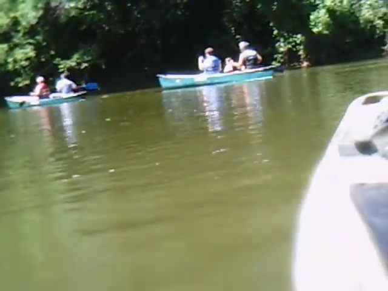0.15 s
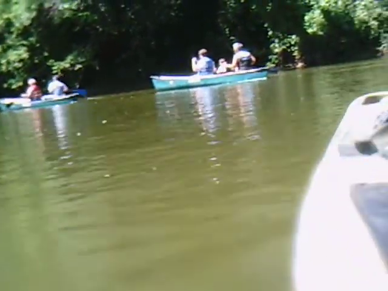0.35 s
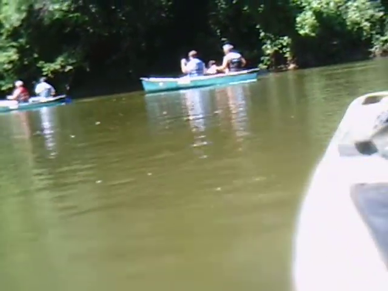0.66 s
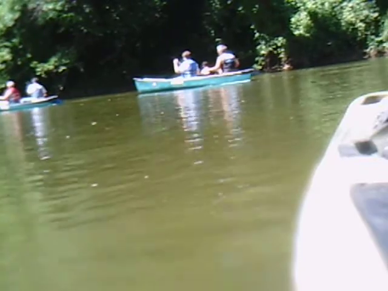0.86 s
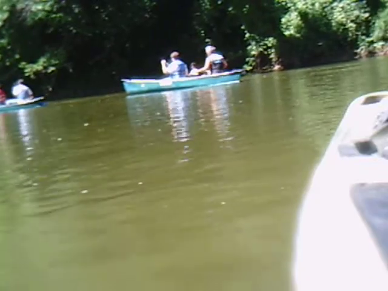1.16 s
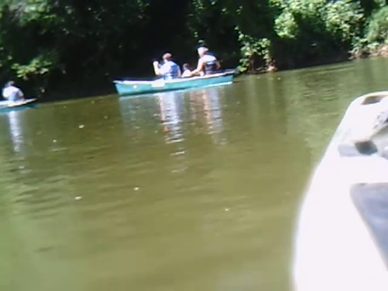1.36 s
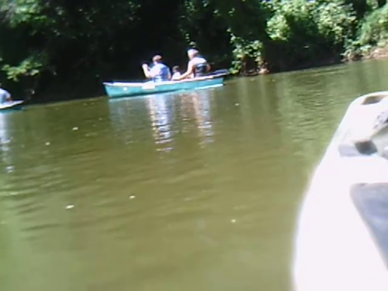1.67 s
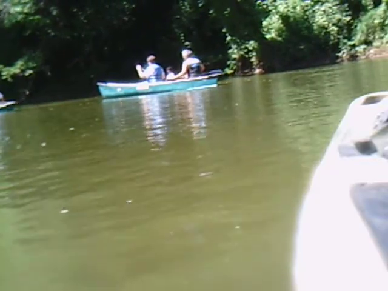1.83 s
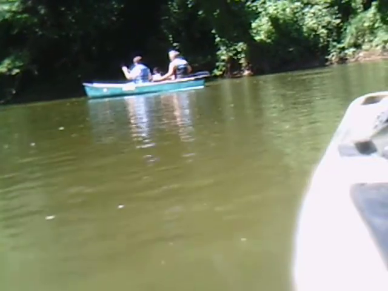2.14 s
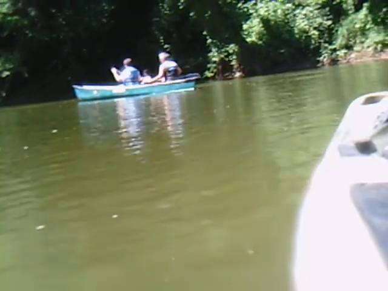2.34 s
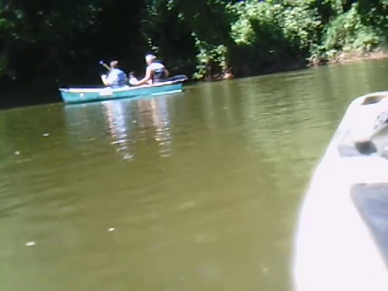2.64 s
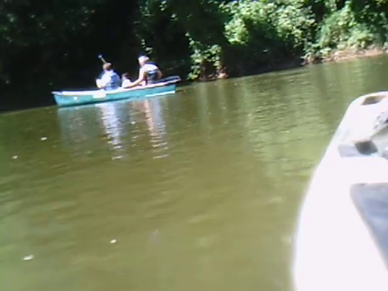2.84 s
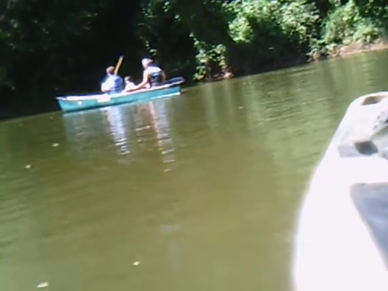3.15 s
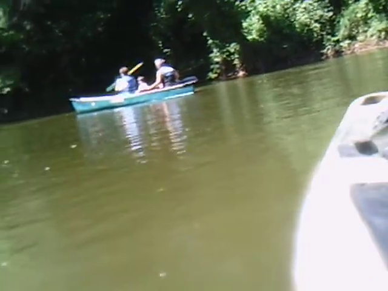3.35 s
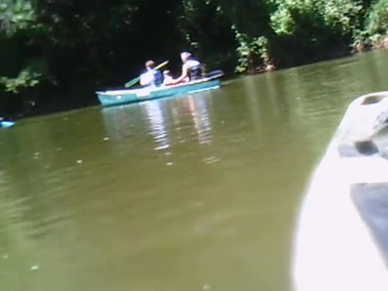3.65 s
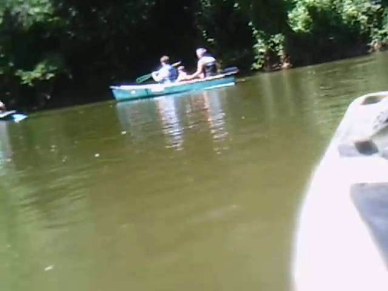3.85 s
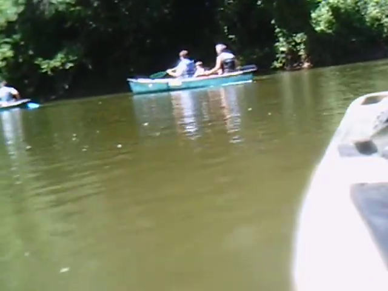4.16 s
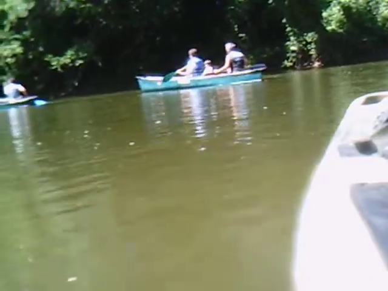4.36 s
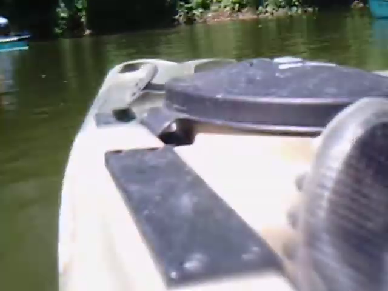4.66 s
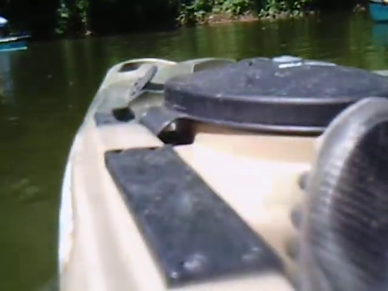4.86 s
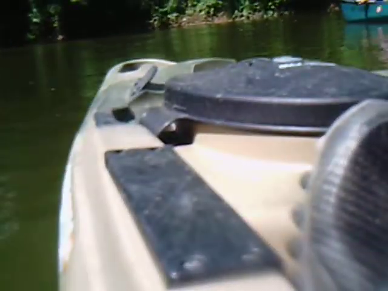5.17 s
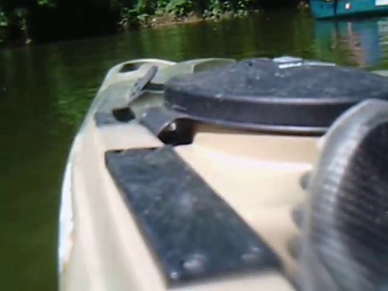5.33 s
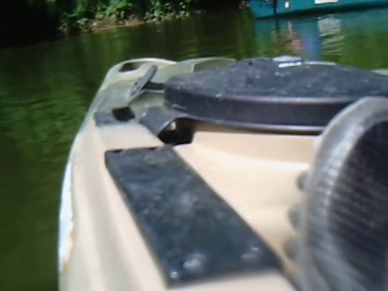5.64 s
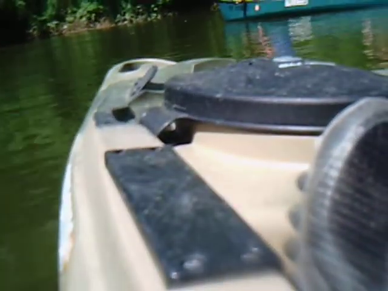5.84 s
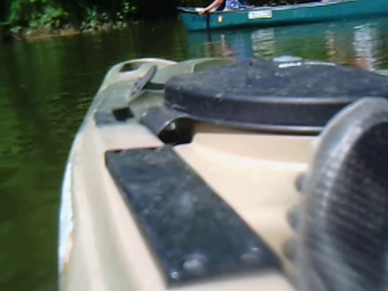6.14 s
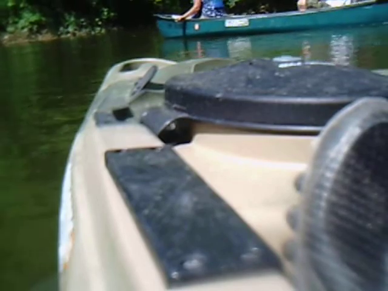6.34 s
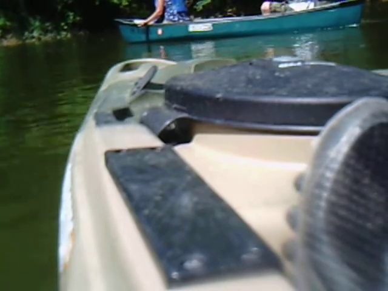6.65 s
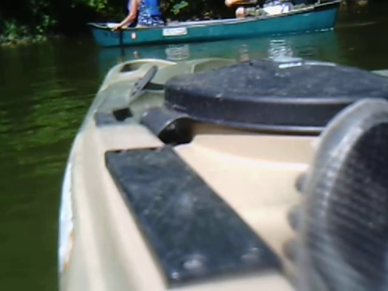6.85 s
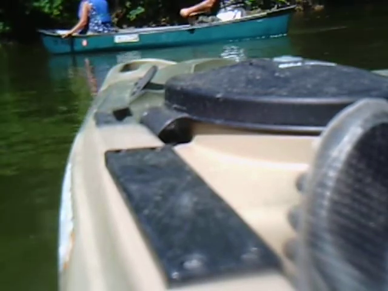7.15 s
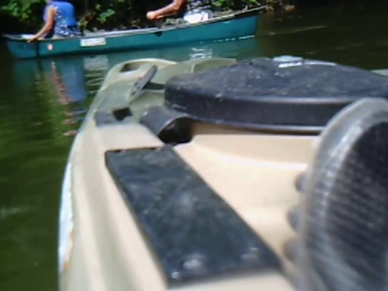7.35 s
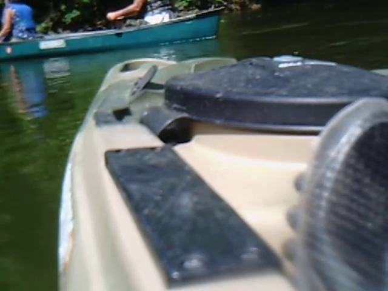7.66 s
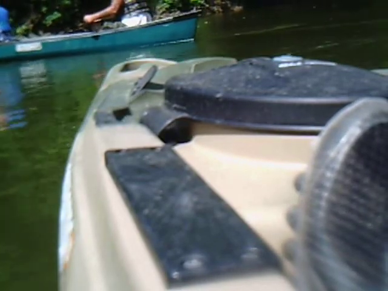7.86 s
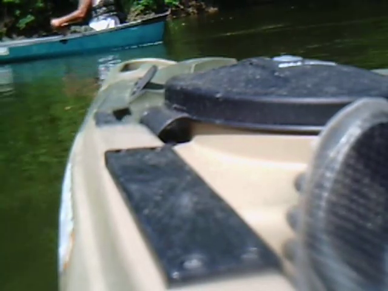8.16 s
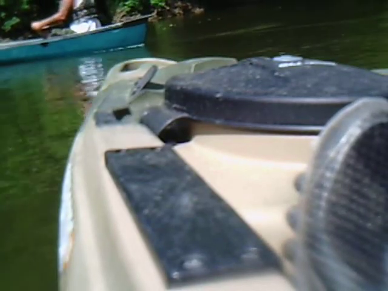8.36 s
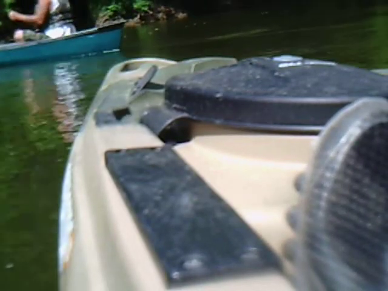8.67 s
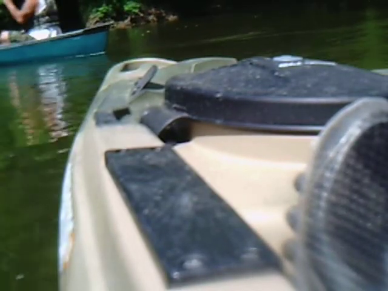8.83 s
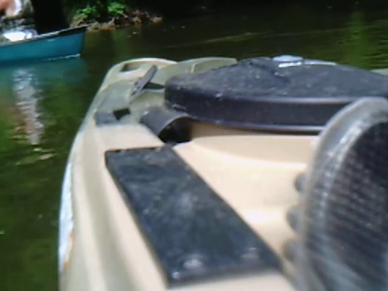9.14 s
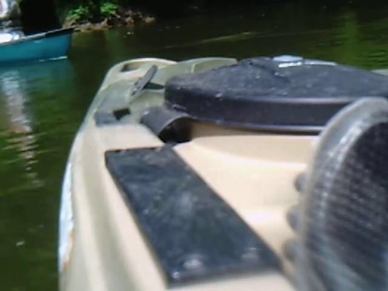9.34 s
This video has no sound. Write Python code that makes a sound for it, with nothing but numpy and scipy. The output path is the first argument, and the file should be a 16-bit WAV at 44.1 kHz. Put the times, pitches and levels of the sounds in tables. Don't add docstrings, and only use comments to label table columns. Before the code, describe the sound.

A faint steady electrical buzz and hiss, a few light plastic taps, then one hard overloaded knock on a hollow kayak hull, followed by tiny ticks.

```python
import sys
import numpy as np
from scipy import signal
from scipy.fft import rfft, irfft
from scipy.io import wavfile

SR = 44100
rng = np.random.default_rng(int(sys.argv[2]) if len(sys.argv) > 2 else 0)


def dump_mix(stems):
    frames = np.atleast_2d(stems).T
    limited = np.clip(frames, -1, 1)
    pcm = np.round(limited * 32767).astype(np.int16)
    wavfile.write(sys.argv[1], SR, pcm)


def voltage_ratio(level):
    return 10 ** (np.asarray(level, float) / 20)


N = 418950


def knock():
    # f/Hz, level/dB, t60/s
    boom = [(27.5, -11, .1), (62, -13, 0.064), (96.3, -3.5, .05), (124, 1.5, .05), (146.8, 5, 0.058),
            (201, -1, .04), (243, -4, .04)]
    body = [(346.5, 1, 0.045), (440, -8, 0.062), (490, -7.5, 0.052), (567, -15.5, 0.023),
            (627, -16.5, 0.025)]
    deck = [(813, -5, 0.024), (965, -5, 0.019), (1050, -2, 0.031), (1100, -1, 0.034), (1273, -13, 0.03),
            (1430, -11.5, 0.023)]
    # f/Hz, level/dB, t60/s
    sway_modes = [(22, -7, 1), (49.1, -3, 0.68), (84, 1.5, 0.84), (161, -2, 0.31), (342, -5, 0.31),
                  (425, -13, 0.22)]
    # t/s, level/dB
    sway_blow = [
        (4.47, -31.5),
    ]
    edge_blows = [
        (4.4008, 7.5),
        (4.4045, 1),
        (4.408, 0),
        (4.4496, -3),
        (4.523, -40),
    ]
    flat_blows = [
        (4.4095, 18),
        (4.4153, 10),
        (4.4211, 2),
        (4.4805, -14.5),
    ]
    fitting_clicks = [
        (4.4315, -8.5),
        (4.473, -24),
        (4.497, -28.5),
        (4.533, -48),
        (4.5425, -31.5),
    ]
    lurches = [
        (4.404, -4),
        (4.428, -6),
        (4.444, -13.5),
        (4.46, -24),
    ]
    edge, flat = (-18, -4, -1.5, -17), (-26, 0, -28, -26)
    click, loose = (-14, -13.5, -5, -2), (-9, -11, -10, -2)
    heave = (0, -22, -30, -40)

    sway = family(sway_modes, np.array(sway_blow), swell_s=0.067, rattle=0.0098, travel_s=0.00069)
    blows = contacts((edge_blows, edge), (flat_blows, flat), (lurches, heave),
                     (fitting_clicks, click), (rattling(count=19), loose))
    snap = cracks(edge_blows[:4], boost_db=-3.5) + cracks(fitting_clicks, boost_db=4)
    return sway + snap + struck(blows, boom, body, deck, metres=.8)


def taps():
    # f/Hz, level/dB, t60/s
    boom = [(124, -10, .12), (169.3, -4, 0.27)]
    body = [(340, 4.5, 0.094), (390, -14, 0.043), (429, -1.5, 0.1)]
    deck = [(610, -4, 0.079), (802, -8.5, 0.058), (922, 1, 0.064), (1008, 1, 0.054), (1150, -6, .04),
            (1320, -3, 0.027), (1420, -8, 0.023)]
    # t/s, level/dB
    edge_taps = [
        (2.9925, -41),
        (3.074, -46.5),
        (3.182, -42),
        (3.407, -44),
        (6.672, -56.5),
        (6.965, -52.5),
        (7.138, -55.5),
    ]
    soft_bumps = [(1.778, -51), (1.797, -55), (3.076, -54), (2.94, -47.5), (2.955, -53), (2.97, -53),
                  (3.184, -54), (5.658, -44)]
    dull_heaves = [(3.1, -55), (3.2, -53), (3.26, -52), (3.32, -55), (3.47, -50), (4.77, -43), (5.685, -47),
                   (5.725, -53)]
    small_clicks = [
        (1.914, -54),
        (7.489, -54),
    ]
    edge, flat = (-8, -3.5, 0, -32), (-2, 0, -10, -30)
    heave, click = (0, -12, -20, -30), (-16, -12, -3, 1)

    blows = contacts((edge_taps, edge), (soft_bumps, flat), (dull_heaves, heave), (small_clicks, click))
    return struck(blows, boom, body, deck, metres=3.09) + cracks(small_clicks, boost_db=4)


def ticks():
    # t/s, level/dB, f/Hz
    loose_parts = [(2.321, -56, 945), (2.857, -54, 1100), (3.769, -59, 1210), (5.41, -62, 1050),
                   (5.465, -61, 1000), (5.53, -59, 1260), (5.566, -58, 1020), (5.659, -45, 394),
                   (5.662, -51, 1050), (5.694, -56, 1000), (5.745, -57, 1100), (6.675, -53, 1150),
                   (6.817, -58, 2700), (7.015, -56.5, 990), (7.14, -53, 1190), (7.489, -53, 3100),
                   (7.16, -51, 1025), (7.244, -55, 1180), (7.42, -54, 1320), (7.475, -54, 1120),
                   (7.49, -46, 3650), (7.65, -55, 1190), (9.48, -55, 948)]
    t60_1khz_s, damping_exponent = 0.048, .4
    out = np.zeros(N)
    for s, db, hz in loose_parts:
        mode = (hz, 3, t60_1khz_s * (1000 / hz) ** damping_exponent)
        out += family([mode], np.array([(s, db)]), swell_s=.006, rattle=0.31, travel_s=.0001)
    return out


def rattling(count):
    start_s, gap_s = 4.404, .005
    first_db, fall_db_per_s, spread_db = -7.5, 400, 2
    chance = rng.standard_normal((count, 2))
    after_s = gap_s * (np.arange(count) + .3 * chance[:, 0])
    level_db = first_db - fall_db_per_s * after_s + spread_db * chance[:, 1]
    return list(zip(start_s + after_s, level_db))


def contacts(*groups):
    return [(s, *(db + np.array(kind))) for events, kind in groups for s, db in events]


def struck(blows, boom, body, deck, metres):
    # f/Hz, level/dB, t60/s
    fittings = [(1642, -5.5, 0.013), (1980, -6, .012), (2400, -5.5, 0.013), (2700, -2.5, .012),
                (3303, -5, 0.011), (3760, -1.5, .012), (4030, -2, .01), (4399, -2, .013),
                (5000, -5.5, .008), (5700, -1.5, .005)]
    blows = np.array(blows)
    return (family(boom, blows[:, [0, 1]], swell_s=0.021, rattle=0.092, travel_s=.0005 * metres)
            + family(body, blows[:, [0, 2]], swell_s=0.02, rattle=0.28, travel_s=.0007 * metres)
            + family(deck, blows[:, [0, 3]], swell_s=0.0056 * metres, rattle=0.33, travel_s=.0008 * metres)
            + family(fittings, blows[:, [0, 4]], swell_s=0.0069, rattle=0.88, travel_s=.0001))


def family(modes, blows, swell_s, rattle, travel_s):
    at, out = (blows[:, 0] * SR).astype(int), np.zeros(N)
    longest_s = max(t60 for hz, db, t60 in modes)
    heard = slice(at.min(), min(N, at.max() + int(2 * SR * longest_s)))
    t = np.arange(round(.02 * SR)) / SR
    chance_db = rng.normal(0, 2.0, (len(at), len(modes)))

    bursts = rng.standard_normal((len(at), len(t))) * np.exp(-t / .003)
    bursts *= rattle / np.sqrt(np.sum(bursts ** 2, axis=1, keepdims=True))
    bursts[:, 0] += 1

    for k, (hz, level_db, t60) in enumerate(modes):
        late = int(travel_s * SR * 1000 / hz)
        when = at[:, None] + late + np.arange(len(t))
        gain = voltage_ratio(blows[:, 1] + level_db + chance_db[:, k])
        force = np.full(N + SR, 1e-18)
        np.add.at(force, when, bursts * gain[:, None])
        spread = ring(force[heard], hz, swell_s) * 2 * np.log(1000) / (swell_s * SR)
        out[heard] += (-1) ** k * ring(spread, hz, t60)
    return out


def ring(force, hz, t60):
    r, w = voltage_ratio(-60 / (t60 * SR)), 2 * np.pi * hz / SR
    return signal.lfilter([.5, 0, -.5], [1, -2 * r * np.cos(w), r * r], force)


def cracks(blows, boost_db):
    t60_s = .022
    t, out = np.arange(round(.03 * SR)) / SR, np.zeros(N)
    for (s, db), noise in zip(blows, rng.standard_normal((len(blows), len(t)))):
        out[int(s * SR):][:len(t)] += voltage_ratio(db + boost_db - 60 * t / t60_s) * noise
    band = signal.butter(2, [500, 4200], "band", fs=SR, output="sos")
    return signal.sosfilt(band, out + 1e-18)


def buzz(leak_hz=150, sag_hz=62, sag_damping=0.54):
    # time from switch-off/ms, size [relative]
    steps = [
        (-10.95, 1),
        (-10.1, .13),
        (-.86, -.17),
        (0, -1),
    ]
    # t/s, shift/ms
    slips = [
        (3.585, -.45),
        (8.905, -.99),
    ]
    cycle_s, late_ms = .0202522, 14.86
    on_wobble_ms, off_wobble_ms = (-.09, .05, .04), (.05, -.08, .03)

    cycle = np.arange(-6, int(N / SR / cycle_s) + 1)
    slipped_ms = sum(ms * (cycle * cycle_s > s) for s, ms in slips)
    off_s = cycle * cycle_s + (late_ms + slipped_ms) / 1000
    lead = SR // 5
    edges = np.zeros(N + 2 * lead)
    for ms, size in steps:
        wobble_ms = np.array(on_wobble_ms if size > 0 else off_wobble_ms)[cycle % 3]
        edge_s = off_s + (ms + wobble_ms) / 1000
        edges[lead + np.round(edge_s * SR).astype(int)] += size

    spikes = signal.lfilter([1], [1, -np.exp(-2 * np.pi * leak_hz / SR)], edges)
    w = 2 * np.pi * sag_hz
    sag = signal.bilinear([1, .9 * w, 0.54 * w * w], [1, 2 * sag_damping * w, w * w], SR)
    return voltage_ratio(-42) * signal.lfilter(*sag, spikes)[lead:lead + N]


def hiss():
    # f/Hz, spectral level/dB
    spectrum = np.array([(8, -19.5), (25, 5), (60, -0.5), (100, 3.5), (150, 4.5), (300, -1.5), (600, -3),
                         (1000, -3.5), (1700, -6), (3000, -6.5), (4800, -8), (6500, -9)])
    hz = np.fft.rfftfreq(N, 1 / SR) + 1
    tilt_db = np.interp(np.log(hz), np.log(spectrum[:, 0]), spectrum[:, 1])
    noise = irfft(rfft(rng.standard_normal(N)) * voltage_ratio(tilt_db), N)
    return voltage_ratio(-56.5) * noise / noise.std()


def scene():
    hull = knock() + taps() + ticks()
    return (hull + buzz() + hiss())[None]


def flatten(x, top):
    return x / (1 + np.abs(x / top) ** 24) ** (1 / 24)


def roll_off(x):
    return signal.sosfilt(signal.butter(12, 16480, fs=SR, output="sos"), x)


def record(dry):
    overload, ceiling = .72, .71
    converter_hz, grain_db = 5503, -102
    hz = np.fft.rfftfreq(N, 1 / SR)
    slope = np.clip((hz - converter_hz) / 900 + 0.65, 0, None)
    narrow = irfft(rfft(flatten(dry, overload)) * voltage_ratio(-18 * slope ** 2), N)
    grain = voltage_ratio(grain_db) * rng.standard_normal(dry.shape)
    top_cut = signal.cheby2(10, 60, 16600, fs=SR, output="sos")
    mix = signal.sosfilt(top_cut, flatten(narrow, ceiling) + grain)
    return roll_off(mix)


dry = scene()
out = record(dry)
dump_mix(out)
```